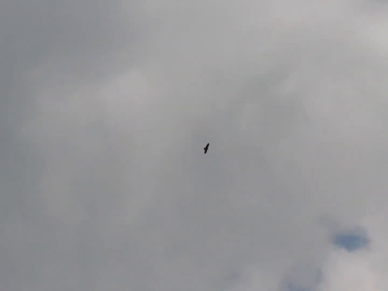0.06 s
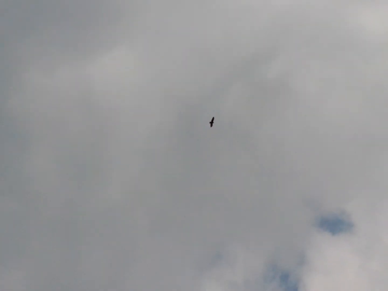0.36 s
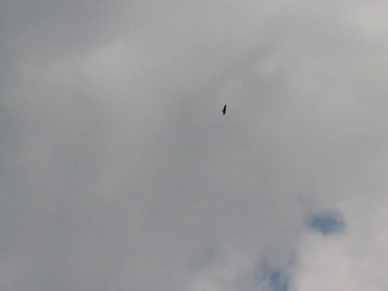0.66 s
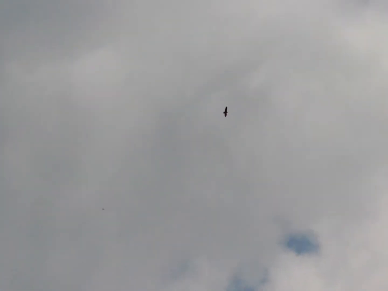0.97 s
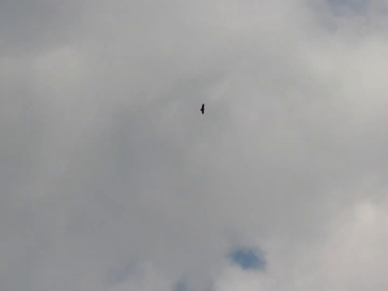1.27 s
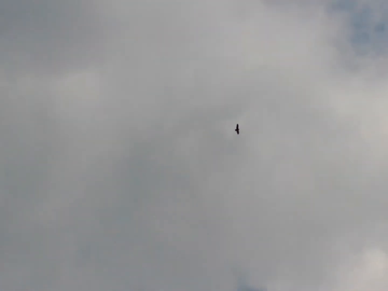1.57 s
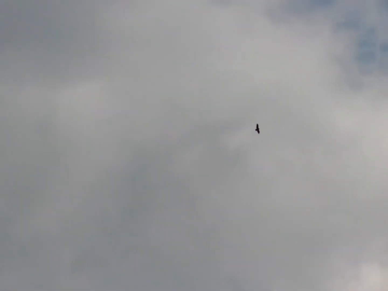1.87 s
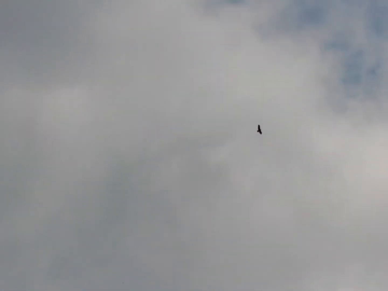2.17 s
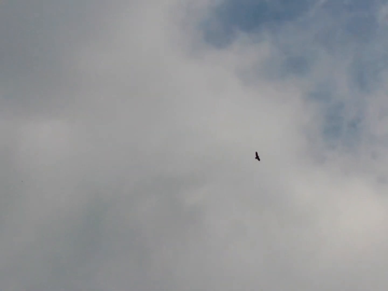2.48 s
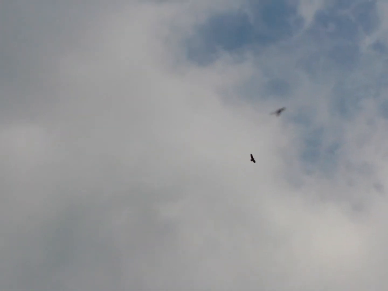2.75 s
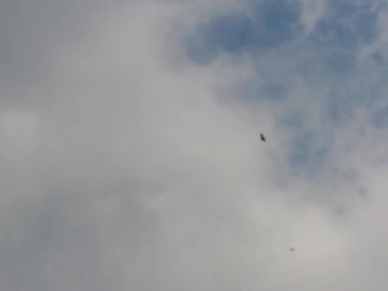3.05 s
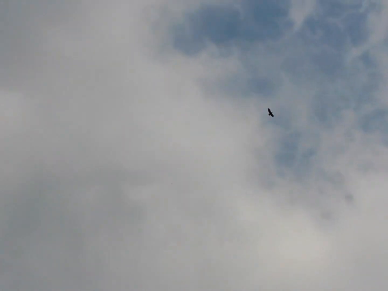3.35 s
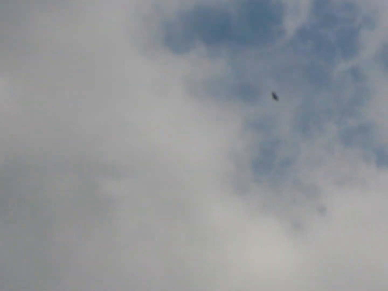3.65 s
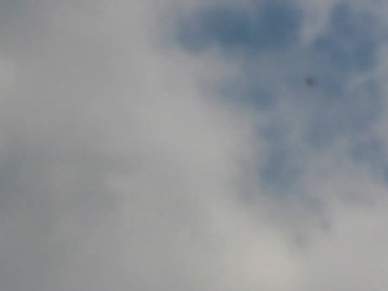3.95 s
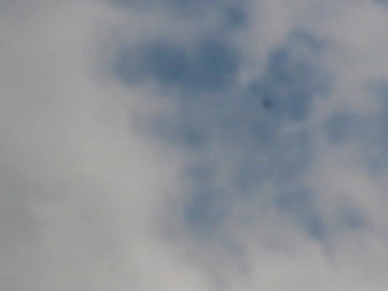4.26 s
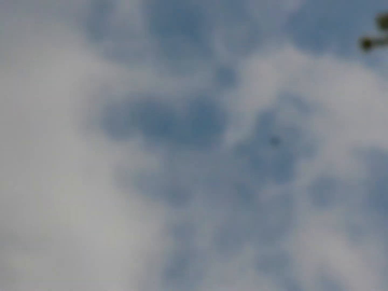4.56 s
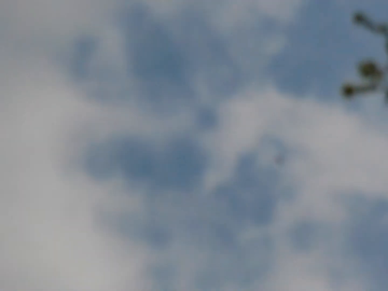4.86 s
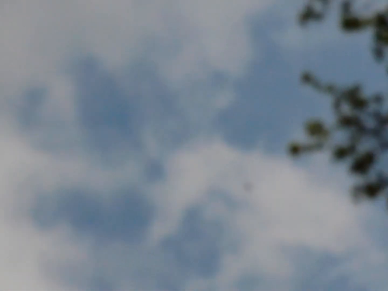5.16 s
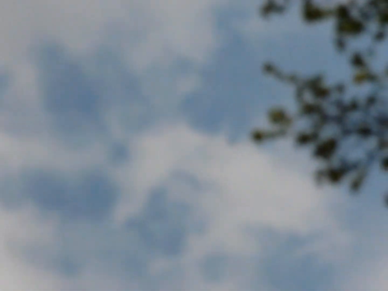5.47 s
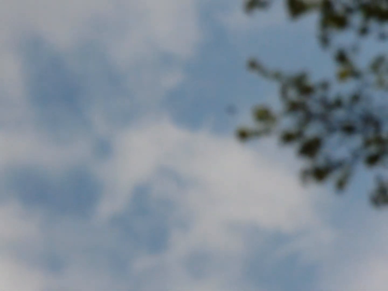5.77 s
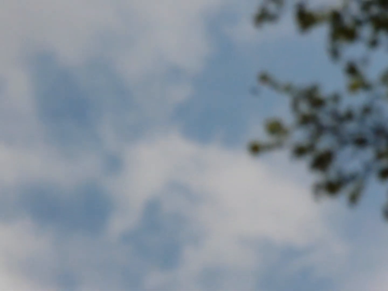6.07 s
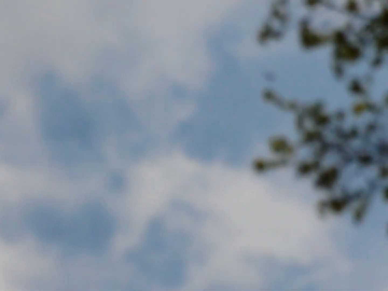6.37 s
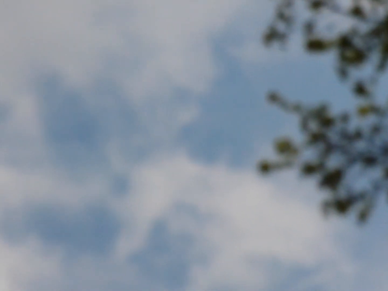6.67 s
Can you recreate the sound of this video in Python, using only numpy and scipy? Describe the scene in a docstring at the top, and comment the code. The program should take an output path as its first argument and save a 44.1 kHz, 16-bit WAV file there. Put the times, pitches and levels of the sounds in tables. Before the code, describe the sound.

Scattered chirps and thin, high bird notes sound over softly hissing leaves, with low puffs of wind and a few dry ticks.

```python
"""Small birds chirp from scattered trees, whose leaves smear each note into a short tail, over a hiss of
air and leaves and a distant rumble that slowly fades. Near 3 s a closer bird whistles, and the breeze
picks up and starts to buffet the two microphone openings in short puffs. Just before 5 s a few dry ticks
sound close by. Then one bird sings five thin, high notes while a faint hollow sound swells far off.
Around 6 s a two-part call comes twice, and the wind ends mostly on the left."""
import sys
import numpy as np
from scipy import signal
from scipy.fft import rfft, irfft
from scipy.io import wavfile

SR = 44100
rng = np.random.default_rng(int(sys.argv[2]) if len(sys.argv) > 2 else 0)


def master_out(mix):
    """Clip the mix to full scale and print it as 16-bit PCM to the path in sys.argv[1]."""
    frames = np.transpose(np.atleast_2d(mix))
    ceiling = np.clip(frames, -1, 1)
    pcm = np.round(ceiling * 32767).astype(np.int16)
    wavfile.write(sys.argv[1], SR, pcm)


N = 305613
TIME = np.arange(N) / SR
FREQS = np.maximum(np.arange(N // 2 + 1) * SR / N, 1)


def from_db(db):
    """Turn decibels into a number to multiply a sound by."""
    return 10 ** (np.asarray(db) / 20)


def rms_one(x):
    """Scale a sound so that its average strength (rms) is 1."""
    return x / np.sqrt(np.mean(x ** 2) + 1e-20)


def over_time(rows):
    """Join a table's points in time, giving one curve for each level column."""
    times, *columns = np.transpose(rows)
    return [np.interp(TIME, times, column) for column in columns]


def over_hz(points):
    """Join a table's points from low to high frequency, giving each octave equal room."""
    hz, value = np.transpose(points)
    return np.interp(np.log(FREQS), np.log(hz), value)


def noise(colour):
    """Noise whose colour says how strong each frequency is."""
    return rms_one(irfft(rfft(rng.standard_normal(N)) * from_db(over_hz(colour)), N))


def stereo_noise(colour, likeness):
    """Noise from all round; left and right are the same (likeness 1), unrelated (0) or opposite (-1)."""
    shared, opposed = rfft(rng.standard_normal((2, N))) * from_db(over_hz(colour))
    alike = np.clip(over_hz(likeness), -1, 1)
    return rms_one(irfft(np.sqrt(1 + alike) * shared + np.sqrt(1 - alike) * opposed * [[1], [-1]], N))


def wander(t, rate):
    """A wobbly line that heads for a new random value `rate` times a second."""
    return np.interp(t * rate, np.arange(2048), rng.standard_normal(2048))


def band(x, low_hz, high_hz):
    """Keep the part of a sound between two frequencies."""
    edges_hz = [low_hz, min(high_hz, .45 * SR)]
    return signal.sosfilt(signal.butter(2, edges_hz, "band", fs=SR, output="sos"), x)


def pan(right_db):
    """Make the right side this much louder than the left (pan/dB in the tables)."""
    return rms_one(from_db(np.array([[-right_db], [right_db]]) / 2))


def add(out, s, sound):
    """Mix a sound in, starting at s seconds."""
    i = int(round(s * SR))
    sound = sound[..., max(-i, 0):N - i]
    out[..., max(i, 0):max(i, 0) + sound.shape[-1]] += sound


# How loud the background is: t/s, rumble level/dB, air level/dB, leaf level/dB
BACKGROUND_LEVELS = [(0, -38.5, -46, -57.5), (1.2, -38, -47.5, -56.5), (2.0, -39.5, -47.5, -55.5),
                     (2.8, -40, -48, -55), (3.6, -42, -47, -52.5), (4.6, -44, -47, -53),
                     (5.4, -45.5, -46.5, -53), (6.2, -44, -47, -53), (6.93, -47.5, -47, -55.5)]
# The colour of each background noise: f/Hz, level/dB
RUMBLE_COLOUR = [(20, -11), (35, -11), (52, 6.5), (90, 0), (130, -0.5), (200, 1.5), (300, -5.5),
                 (380, -4.5), (480, -12), (600, -11), (800, -20), (1500, -54.5), (5000, -64.5)]
AIR_COLOUR = [(30, -28), (300, -12.5), (700, -5), (1000, -0.5), (1350, -2), (1650, -4), (2050, -4.5),
              (2800, -11), (3600, -12), (4600, -16), (7000, -22), (15000, -29)]
LEFT_LEAF_COLOUR = [(1000, -8.5), (3000, -40), (4500, -6), (5900, -1.5), (7000, -6), (8000, -13),
                    (9500, -23), (14500, -27)]
RIGHT_LEAF_COLOUR = [(1000, -23.5), (3000, -5), (4800, -2), (6000, -0.5), (7600, 4.5), (8900, -1.5),
                     (10700, -4), (12300, -2.5), (14500, -19)]
# How alike left and right are: f/Hz, likeness
RUMBLE_LIKENESS = [(50, 1), (300, 0.896), (700, 0.47)]
AIR_LIKENESS = [(400, 1), (800, 0.517), (1150, -0.12), (1700, -0.41), (2050, -0.08), (2400, 0.363),
                (2850, -0.059), (3500, -0.084)]

def background(stir_db=1.76, stirs_per_s=9):
    """A far rumble, the rush of open air and softly stirring leaves."""
    rumble_db, air_db, leaves_db = over_time(BACKGROUND_LEVELS)
    rumble = from_db(rumble_db) * stereo_noise(RUMBLE_COLOUR, RUMBLE_LIKENESS)
    air = from_db(air_db) * pan(right_db=1.5) * stereo_noise(AIR_COLOUR, AIR_LIKENESS)
    leaves = pan(right_db=4.0) * np.array([noise(LEFT_LEAF_COLOUR), noise(RIGHT_LEAF_COLOUR)])
    return rumble + air + from_db(leaves_db + stir_db * wander(TIME, stirs_per_s)) * leaves


# How the hollow sound rises and falls: t/s, level/dB
SWELL_LEVELS = [(0, -90), (4.95, -83.5), (5.2, -51.5), (5.38, -50), (5.55, -61), (5.72, -53), (5.95, -72),
                (6.93, -89.5)]
# Its colour: f/Hz, level/dB
SWELL_COLOUR = [(600, -52), (1150, -18.5), (1400, 0), (1560, -3), (1800, -11.5), (3500, -49)]

def hollow_swell():
    """A narrow band of noise swells twice, faint and far off."""
    return from_db(over_time(SWELL_LEVELS)[0]) * stereo_noise(SWELL_COLOUR, AIR_LIKENESS)


# A high tone: f/Hz, level/dB
WHINE_TONES = [(10002, -79)]

def whine():
    """A very faint, steady whine."""
    return sum(from_db(db) * rms_one(np.sin(2 * np.pi * hz * TIME)) for hz, db in WHINE_TONES)


def eddy(hz, roundness=2.9, leak_hz=39):
    """A small swirl of air passes a microphone opening: one bump of pressure between two dips."""
    t = TIME[:SR // 10] - .05
    distance_squared = (np.pi * hz * t) ** 2 / roundness   # from the swirl's centre to the opening
    bump = (1 - (2 * roundness + 1) * distance_squared) / (1 + distance_squared) ** (roundness + 2)
    # The opening leaks slow changes of pressure, which deepens the second dip.
    return signal.lfilter(*signal.butter(1, leak_hz, "high", fs=SR), bump)


# The breeze rises in waves: t/s, left level/dB, right level/dB
BREEZE_LEVELS = [(0, -76, -65.5), (2.4, -64, -51.5), (2.75, -49, -38.5), (3.2, -53.5, -40),
                 (3.7, -40.5, -41), (4.12, -27.5, -31.5), (4.3, -41, -41.5), (4.85, -38.5, -35),
                 (5.27, -40.5, -37.5), (5.6, -35, -33.5), (5.85, -30.5, -25.5), (5.95, -35, -39),
                 (6.1, -26, -43.5), (6.42, -27, -35), (6.55, -30.5, -35), (6.93, -32, -50)]
# The deep colour of wind on a microphone: f/Hz, level/dB
WIND_COLOUR = [(15, -19), (32, -1), (52, 11), (85, 6), (140, 3.5), (220, -12.5), (350, -18), (600, -33),
               (1500, -81), (5000, -90)]

def wind(lump_db=2.5, lumps_per_s=25, strays_per_s=8.3, stray_db=2, stray_hz=139):
    """Each opening gets its own churning air and stray swirls, both growing with the breeze."""
    breeze_db = over_time(BREEZE_LEVELS)
    churn = [from_db(db + lump_db * wander(TIME, lumps_per_s)) * noise(WIND_COLOUR) for db in breeze_db]
    strays = (rng.random((2, N)) < strays_per_s / SR) * from_db(breeze_db) * from_db(stray_db)
    return np.array(churn) + signal.fftconvolve(strays, eddy(stray_hz)[None], "same", axes=1)


# Puffs of wind: t/s, length/s, level/dB, f/Hz, pan/dB
WIND_PUFFS = [ (2.564, 0.0078, -15.5, 80, 28.5), (3.311, 0.0069, -23, 80, -9),
              (3.823, .006, -21.5, 107, -16.5), (4.0265, .005, -10, 135, -23.5),
              (4.0352, 0.0054, -10, 110, -24), (4.092, .005, -12, 115, -15),
              (4.1133, 0.0081, -12.5, 115, -23), (4.16, .006, -25.5, 170, -17.5), (4.617, .025, -26, 70, 1),
              (4.839, .0064, -20.5, 107, -15), (5.124, .0094, -22, 97, 24.5),
              (5.417, 0.017, -16.5, 122, -29.5), (5.829, 0.04, -16.5, 146, 22),
              (5.865, 0.012, -18.5, 130, 16), (5.871, .0075, -16.5, 140, -9),
              (5.887, .006, -18, 119, -13.5), (5.98, .006, -20, 149, -27), (6.059, .015, -15, 182, -34),
              (6.0975, .0072, -12.5, 107, -24.5), (6.159, .025, -21, 100, -25),
              (6.183, .024, -18, 105, -27.5), (6.2364, 0.0089, -7, 107, -35.5),
              (6.2533, 0.0072, -17, 85, -29.5), (6.2866, 0.0084, -16, 149, -21.5),
              (6.3055, .007, -12.5, 186, -32), (6.367, 0.015, -16.5, 135, -21),
              (6.3826, .009, -18, 115, -21), (6.398, .005, -14, 110, -32),
              (6.4063, 0.0063, -11.5, 122, -30.5), (6.453, .0062, -21, 165, -22),
              (6.666, .005, -19.5, 138, -24), (6.736, .0069, -19, 139, -32),
              (6.905, .0051, -15.5, 149, -32.5), (6.91, .0162, -15, 139, -33.5)]

def puffs(count=6, gap_s=0.00902, unevenness=0.14, fade_db=16, lead_s=0.00736, lead_db=-12):
    """A small swirl leads each puff's strongest one; weaker ones follow at uneven gaps and sizes."""
    out = np.zeros((2, N))
    chances = rng.standard_normal((len(WIND_PUFFS), 2, count))
    for (s, length, level_db, hz, right_db), chance in zip(WIND_PUFFS, chances):
        gaps, sizes = np.exp(unevenness * chance)
        delays = gap_s * (np.cumsum(gaps) - gaps[0])
        fades_db = -fade_db * (delays / length) ** 2
        for delay, db, size in [(-lead_s, lead_db, 1), *zip(delays, fades_db, sizes)]:
            bump = from_db(level_db + db) * eddy(hz / size)
            add(out, s + delay - len(bump) / SR / 2, pan(right_db) * bump)
    return out


# Soft rustles close by: t/s, length/s, level/dB, centre f/Hz, pan/dB
RUSTLES = [(4.523, 0.018, -48, 1870, 5.5), (4.866, 0.121, -56, 10500, 17.5),
           (4.909, 0.023, -44.5, 8450, 19), (6.076, 0.045, -52.5, 5640, 6.5),
           (6.373, 0.053, -53.5, 6700, 14)]

def rustles(grain_db=7, grains_per_s=700, spread=1.6):
    """Noise that flickers very fast makes short clumps of tiny crackles."""
    out = np.zeros((2, N))
    for s, length, level_db, hz, right_db in RUSTLES:
        t = TIME[:int(length * SR)]
        hiss = rng.standard_normal((2, SR // 4))[:, :len(t)]
        grains = hiss * from_db(grain_db * wander(t, grains_per_s))
        clump = band(grains * np.sqrt(np.sin(np.pi * t / length)), hz / spread, hz * spread)
        add(out, s, from_db(level_db) * pan(right_db) * rms_one(clump))
    return out


# Dry ticks: t/s, level/dB, f/Hz, pan/dB
TICKS = [(4.8735, -35, 11500, 12), (4.8773, -35, 10500, 15.5), (4.9008, -32, 12000, 14.5),
         (4.9064, -9.5, 7650, 16), (4.9103, -34, 11400, 14), (4.9148, -36, 10300, 13.5),
         (4.9253, -37, 10500, 12), (4.926, -25.5, 4400, -6), (4.9455, -25, 7950, 17),
         (4.9583, -29, 10500, 16.5), (4.9683, -32, 10500, 16.5), (5.009, -21.5, 7600, 17),
         (5.2715, -17, 6200, 9), (5.876, -26.5, 7330, 9.5)]
# The tones that ring in a tick: multiple of its f, level/dB, time to fade by 60 dB/s
TICK_TONES = [(.55, -14, .0025), (.88, 2, 0.0019), (1.03, 0.5, .0026), (1.5, -13, 0.0014)]

def ticks(contact_s=0.00023, crack_db=-19, crack_fade_s=.004, bounce_s=0.000734, bounce_db=-2):
    """A tiny hard hit gives a bright crack, rings for a moment and bounces once."""
    out, t = np.zeros((2, N)), TIME[:SR // 64]
    for (s, level_db, hz, right_db), hiss in zip(TICKS, rng.standard_normal((len(TICKS), len(t)))):
        ring = sum(from_db(db - 60 * t / fade_s) * np.sin(2 * np.pi * min(ratio * hz, SR / 2) * t)
                   for ratio, db, fade_s in TICK_TONES)
        ring *= 1 - np.exp(-t / contact_s)
        crack = band(hiss * from_db(crack_db - 60 * t / crack_fade_s), hz / 2.4, hz * 1.5)
        gain = from_db(level_db) * pan(right_db)
        add(out, s, gain * (ring + crack))
        add(out, s + bounce_s, gain * from_db(bounce_db) * ring)
    return out


# The tail that trees give a note: build-up/s, time to fade by 60 dB/s, the same for the treble/s
NEAR_TREES, FAR_TREES, OPEN_TREES = (.015, .62, .55), (.025, .75, .62), (.02, .5, .4)

def trees(x, build_s, fade_s, treble_fade_s, split_hz=6000):
    """Trunks and leaves scatter a call into a tail, different on each side; the treble dies sooner."""
    t = TIME[:SR]
    low, high = rng.standard_normal((2, 2, SR))
    tail = band(low, 1070, split_hz) * from_db(-60 * t / fade_s)
    tail += band(high, split_hz, 8360) * from_db(-60 * t / treble_fade_s)
    tail *= 1 - np.exp(-t / build_s)
    tail /= np.sqrt(2 * np.sum(tail ** 2, axis=1, keepdims=True))
    return signal.fftconvolve(x, tail, axes=1)[:, :N]


def bird_voice(length, pitches, warble_hz, swell, overtone_db, warble_rate, softness, shimmer_db=3.0):
    """A bird's throat sings an almost pure tone that slides through three pitches with a ragged warble."""
    t = TIME[:int(length * SR)]
    progress = t / length
    glide_hz = np.polyval(np.polyfit([0, .5, 1], pitches, 2), progress)
    wobble = np.sin(2 * np.pi * np.cumsum(warble_rate * (1 + 0.303 * wander(t, 91.7))) / SR)
    warble = .75 * wobble + .65 * wander(t, 600)
    phase = 2 * np.pi * np.cumsum(glide_hz + warble_hz * warble) / SR
    loudness = np.abs(np.sin(np.pi * progress ** swell)) ** softness   # a bigger swell peaks later
    loudness *= from_db(shimmer_db * wander(t, 151.0))
    return rms_one(loudness * (np.sin(phase) + from_db(overtone_db) * np.sin(2 * phase)))


def slur(start_hz, end_hz, sag_hz=39.3):
    """Start, middle and end pitch of a slide that sags a little in the middle."""
    return start_hz, (start_hz + end_hz) / 2 - sag_hz, end_hz


# Thick clumps of trees throw a note back: delay t/s, level/dB
TREE_ECHOES = [(.068, 1), (.127, -2), (.195, -8)]

def birds(notes, swell, lean, overtone_db, direct_db, scatter_db,
          echo_db=None, grove=NEAR_TREES, warble_rate=130, softness=0.42):
    """Each note arrives straight from the bird, again through the trees and, if asked, as echoes."""
    direct, into_trees, echoes = np.zeros((3, 2, N))
    for s, length, pitches, level_db, right_db, warble_hz in notes:
        note_swell = swell * (pitches[-1] / pitches[0]) ** lean   # moves the peak toward the higher end
        voice = bird_voice(length, pitches, warble_hz, note_swell, overtone_db, warble_rate, softness)
        note = from_db(level_db) * pan(right_db) * voice
        nearness_db = 0.085 * (level_db + 44)   # louder birds are nearer, so more comes straight
        add(direct, s, from_db(direct_db + nearness_db) * note)
        add(into_trees, s, note)
        if echo_db is not None:
            for delay, db in TREE_ECHOES:
                add(echoes, s + delay, from_db(echo_db + db) * note)
    if echo_db is not None:
        direct += trees(echoes, build_s=.002, fade_s=.11, treble_fade_s=.09)
    return direct + from_db(scatter_db) * trees(into_trees, *grove)


# Clear whistles: t/s, length/s, start f/Hz, middle f/Hz, end f/Hz, level/dB, pan/dB
WHISTLES = [ (2.824, 0.11, 5553, 5179, 5250, -48.5, -7), (3.077, 0.06, 3570, 3890, 4308, -48, 9),
            (3.312, .062, 3645, 3910, 4317, -51, 19)]

def whistles(warble_hz=16):
    """A nearer bird's clean notes swell toward their end and echo faintly."""
    notes = [(s, length, pitches, db, right, warble_hz) for s, length, *pitches, db, right in WHISTLES]
    return birds(notes, swell=2.7, lean=0.62, overtone_db=-21, direct_db=0, scatter_db=-12,
                 echo_db=-21, grove=OPEN_TREES)


# Two-part calls: t/s, level/dB, then the pip's length/s, start f/Hz, end f/Hz, warble/Hz, echo level/dB
PIP_CALLS = [(5.952, -45, 0.0303, 3675, 4080, 70, -13), (6.111, -46.5, 0.023, 3800, 3750, 25, -1.5)]

def pip_calls(pip_db=-1.5, pip_right_db=7,
              fall_after_s=0.023, fall_s=0.0473, fall_right_db=1, fall_warble_hz=120):
    """A short pip and a lower, trembling fall, sung twice; the second pip is purer and echoes more."""
    pips, falls = np.zeros((2, N)), []
    fall_pitches = slur(start_hz=3380, end_hz=3093)
    for s, db, length, start_hz, end_hz, warble_hz, echo_db in PIP_CALLS:
        pip = (s, length, slur(start_hz, end_hz), db + pip_db, pip_right_db, warble_hz)
        pips += birds([pip], swell=0.95, lean=0, overtone_db=-61, direct_db=-2, scatter_db=0,
                      echo_db=echo_db)
        falls.append((s + fall_after_s, fall_s, fall_pitches, db, fall_right_db, fall_warble_hz))
    return pips + birds(falls, swell=1, lean=1.5, overtone_db=-61.5, direct_db=-1, scatter_db=-3.5,
                        warble_rate=63)


# Thin, high notes: t/s, start f/Hz, droop/Hz, level/dB, warble/Hz
THIN_NOTES = [(5.066, 8120, 602, -44, 120), (5.217, 8160, 636, -45, 95), (5.37, 8120, 558, -46, 75),
              (5.528, 8280, 330, -46, 55), (5.685, 8360, 360, -46, 50)]

def thin_song(hold_s=.075, early_droop=0.383, right_db=14,
              buzz_after_s=.052, buzz_s=0.0556, buzz_db=-4, buzz_warble_hz=260):
    """A bird on the right repeats a high note that swells, then droops into a buzz; each starts purer."""
    notes = []
    for s, hz, droop_hz, db, warble_hz in THIN_NOTES:
        bend_hz = hz - early_droop * droop_hz
        notes.append((s, hold_s, (hz, (hz + bend_hz) / 2, bend_hz), db, right_db, warble_hz))
        buzz_pitches = slur(bend_hz, hz - droop_hz)
        notes.append((s + buzz_after_s, buzz_s, buzz_pitches, db + buzz_db, right_db, buzz_warble_hz))
    return birds(notes, swell=1.6, lean=1.8, overtone_db=-50, direct_db=-2.5, scatter_db=1, softness=0.89)


# Scattered chirps: t/s, length/s, start f/Hz, end f/Hz, level/dB, pan/dB, warble/Hz
CHIRPS = [ (-.04, 0.13, 3720, 3703, -52, 2, 27), (0.045, 0.062, 4510, 4520, -55, 2.5, 230),
          (0.117, 0.0374, 5370, 5180, -57.5, 2, 257), (0.131, 0.033, 4240, 4044, -54, 3, 201),
          (0.963, 0.08, 3570, 3143, -58.5, 4, 100), (1.12, 0.092, 3700, 4200, -57, 2.5, 307),
          (1.195, 0.061, 4260, 4795, -54, 1, 290), (1.466, 0.045, 6680, 6750, -57, 3, 22),
          (1.518, 0.113, 3264, 3082, -61, 6, 38), (1.697, 0.085, 5060, 5720, -52.5, 0, 260),
          (1.836, 0.078, 6900, 7100, -61, 4, 220), (1.876, 0.055, 5400, 5430, -60, 0, 170),
          (1.882, 0.12, 4260, 4110, -56, 2.5, 500), (2.119, 0.097, 4220, 4290, -58.5, 2, 200),
          (2.692, 0.053, 5242, 5080, -55.5, 0, 257), (2.71, 0.058, 7560, 7630, -56, 12.5, 27),
          (2.76, 0.064, 6700, 7640, -57, 8, 430), (2.933, 0.038, 8000, 7980, -60, 8, 19.4),
          (3.042, 0.13, 3740, 3840, -58, 6.5, 94), (3.144, 0.099, 4730, 4730, -60, -5.5, 62),
          (3.281, 0.088, 4700, 4490, -57, -3.5, 128), (3.416, 0.043, 4040, 3966, -58, 3, 38),
          (4.042, 0.0843, 3950, 4180, -53, 4, 270), (4.11, 0.11, 4110, 4600, -54.5, 3, 400),
          (4.226, 0.045, 7450, 7860, -46, 10, 100), (4.265, 0.04, 6680, 6740, -52, 0, 120),
          (4.283, 0.11, 6200, 6150, -54.5, 0, 510), (4.324, 0.053, 7600, 7410, -41, 10.5, 180),
          (4.358, 0.064, 7260, 6880, -44.5, 4.5, 370), (4.591, 0.02, 4330, 3950, -41, 8, 190),
          (4.607, 0.031, 3960, 3805, -43.5, 7, 193), (4.635, 0.076, 3875, 3674, -47, 4, 140),
          (6.376, 0.029, 5860, 5350, -54, 1.5, 60)]

def chirps(far_below_db=-50.5):
    """Birds all round sing single slides, pure or buzzy; faint ones from deep in the trees linger more."""
    near, far = [], []
    for s, length, start_hz, end_hz, db, right_db, warble_hz in CHIRPS:
        group = far if db < far_below_db else near
        group.append((s, length, slur(start_hz, end_hz), db, right_db, warble_hz))
    return (birds(near, swell=0.9, lean=2.8, overtone_db=-52.5, direct_db=-2.5, scatter_db=1)
            + birds(far, swell=0.94, lean=2.7, overtone_db=-52, direct_db=-0.9, scatter_db=0,
                    grove=FAR_TREES, softness=0.72))


def scene():
    """Birds far and near over the background, with wind, ticks and rustles at the microphone."""
    calls = chirps() + thin_song() + pip_calls() + whistles()
    return calls + hollow_swell() + background() + whine() + wind() + puffs() + ticks() + rustles()


def record(dry):
    """Cut away the highest treble, above 14700 Hz."""
    return signal.sosfilt(signal.ellip(12, .1, 80, 14700, fs=SR, output="sos"), dry)


dry = scene()
out = record(dry)
master_out(out)
```